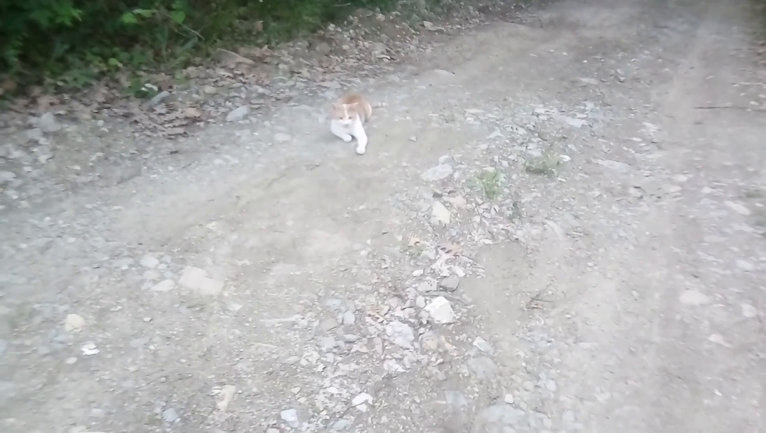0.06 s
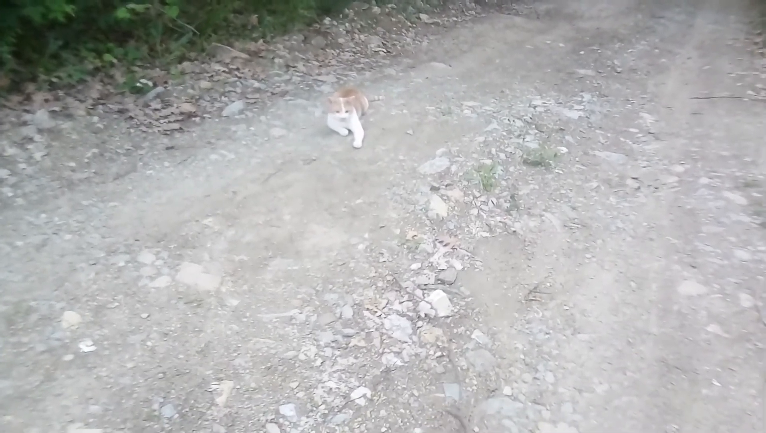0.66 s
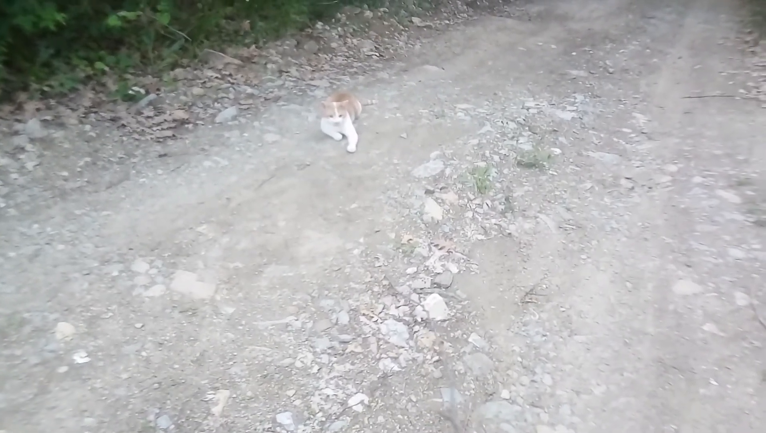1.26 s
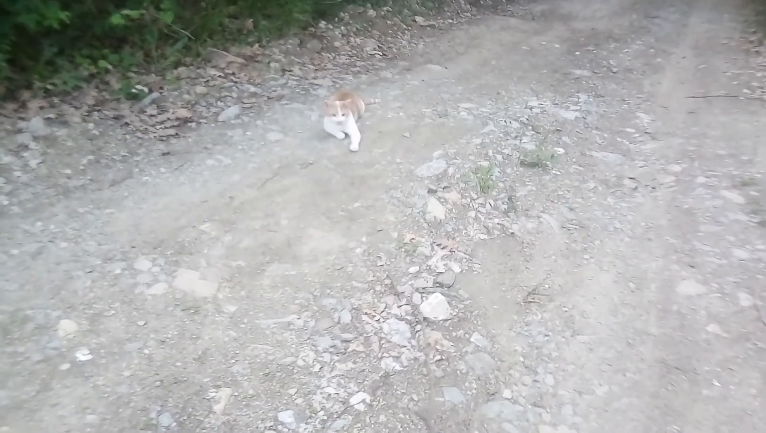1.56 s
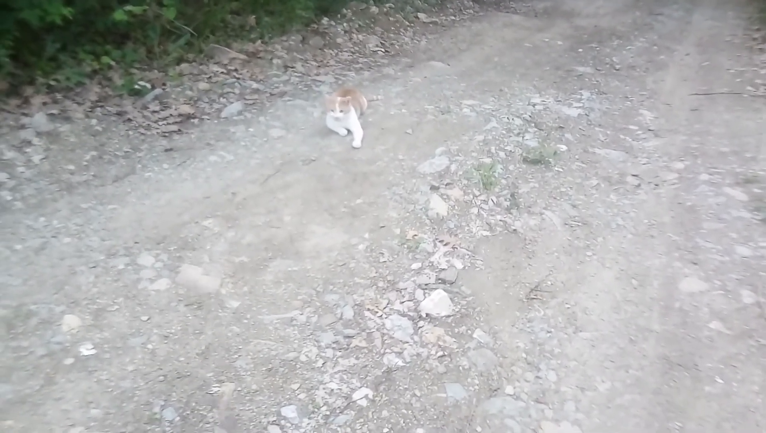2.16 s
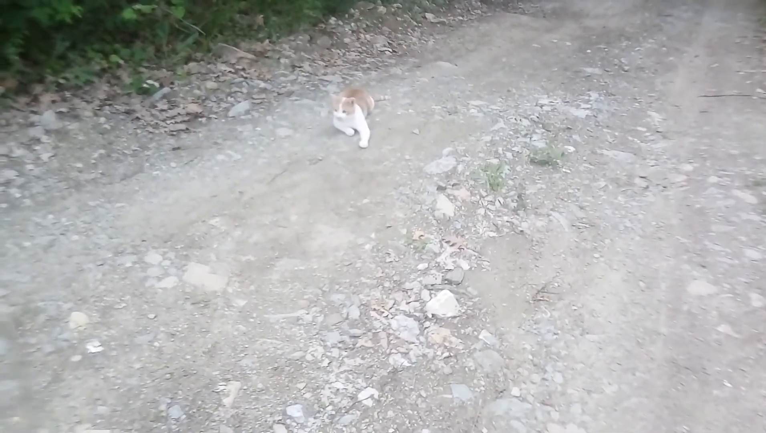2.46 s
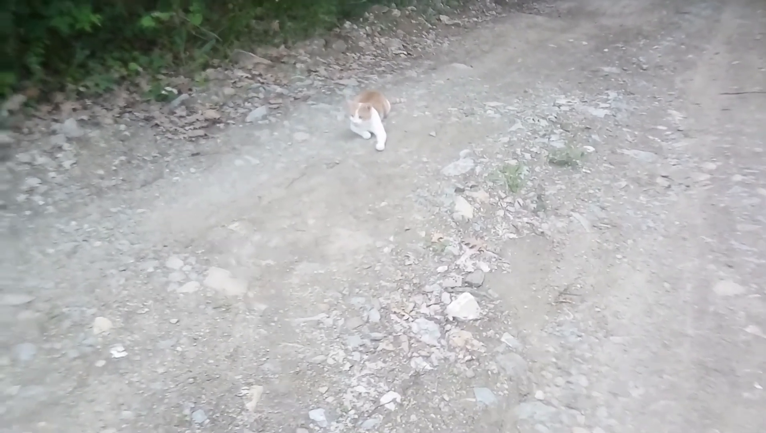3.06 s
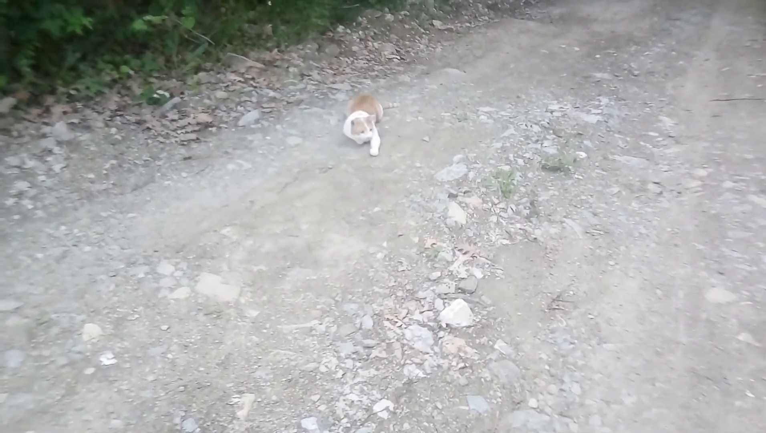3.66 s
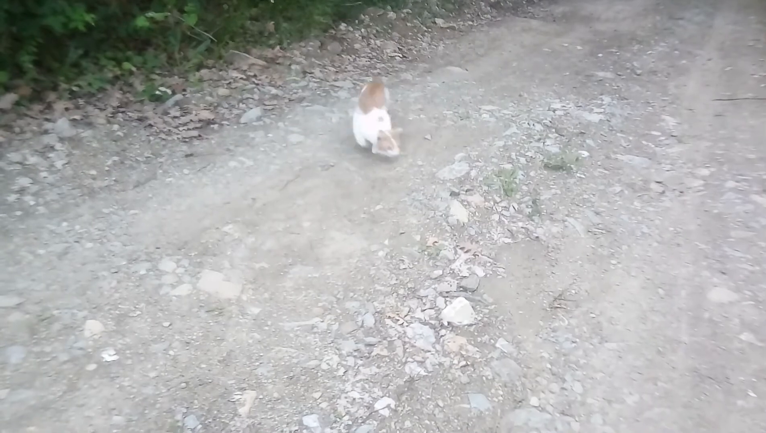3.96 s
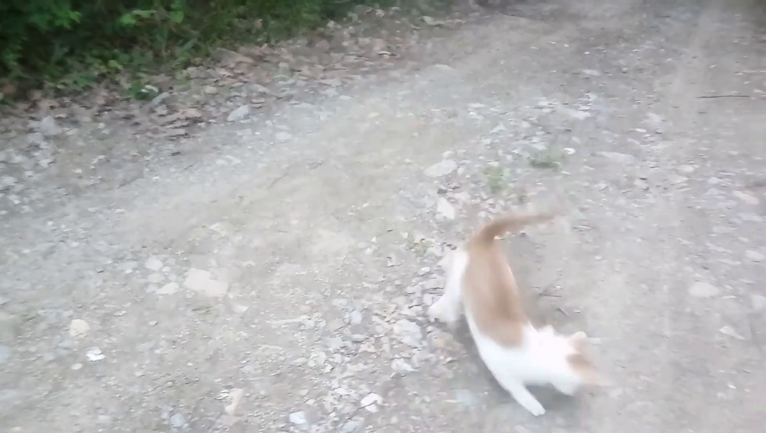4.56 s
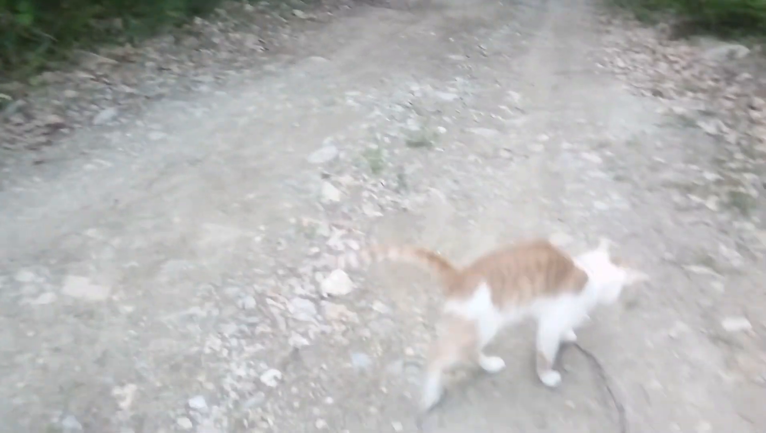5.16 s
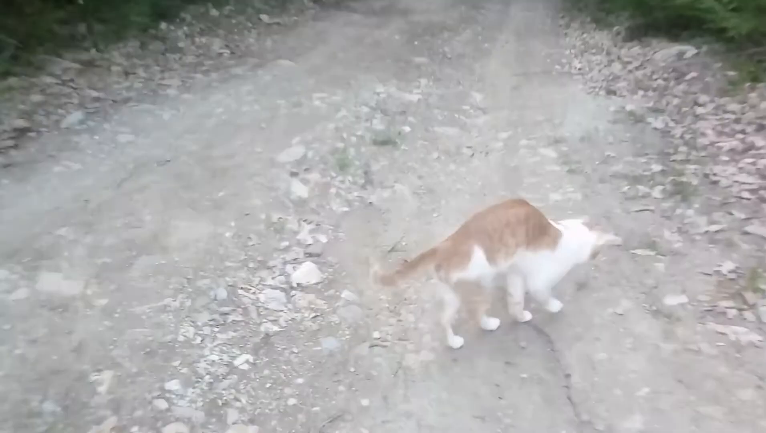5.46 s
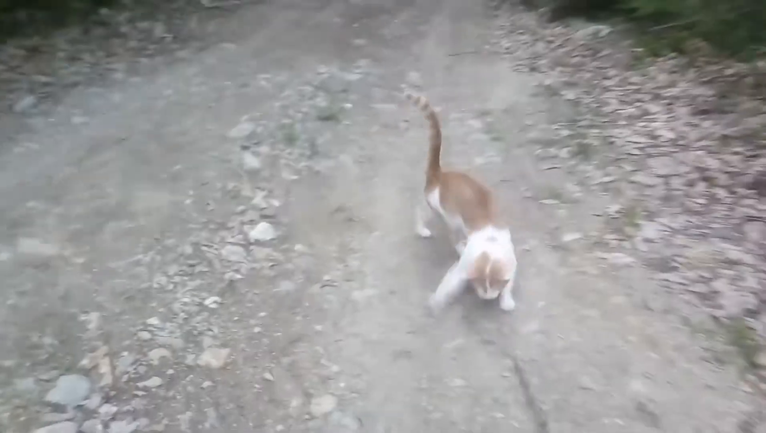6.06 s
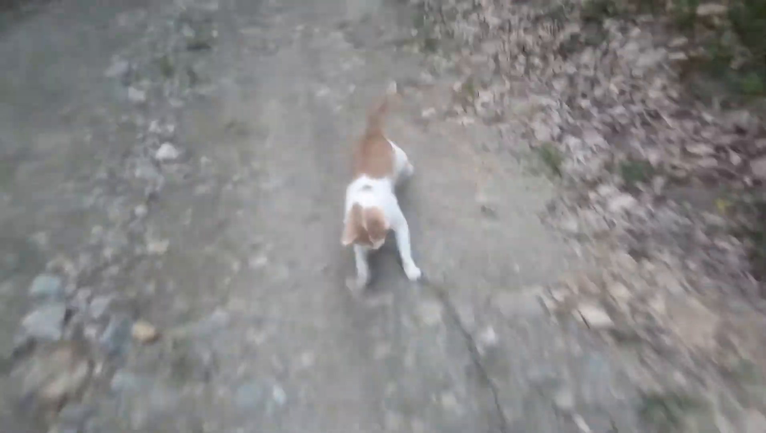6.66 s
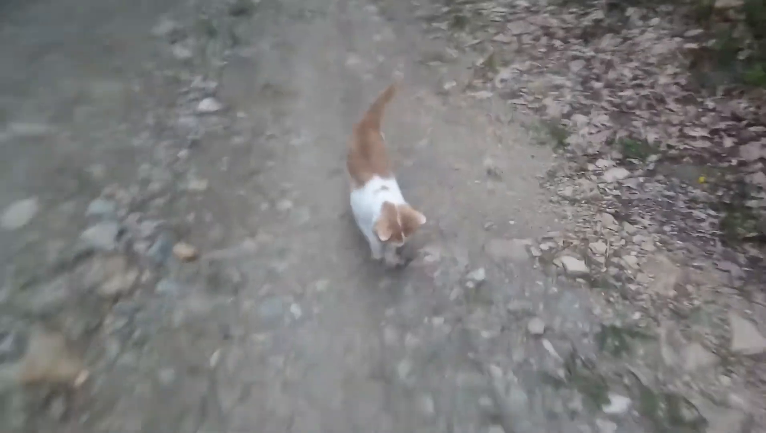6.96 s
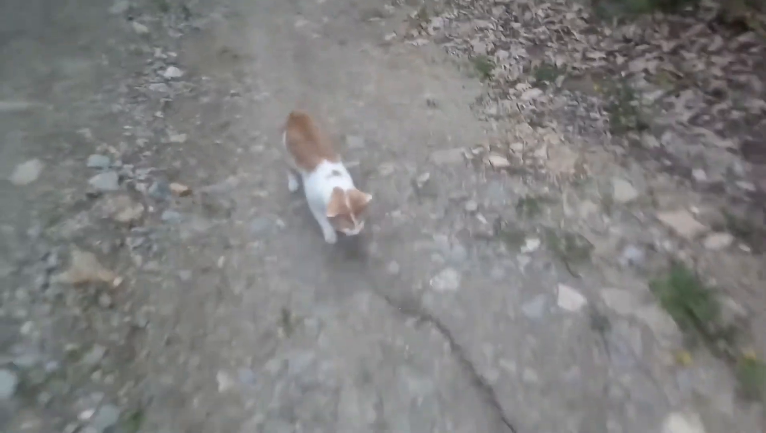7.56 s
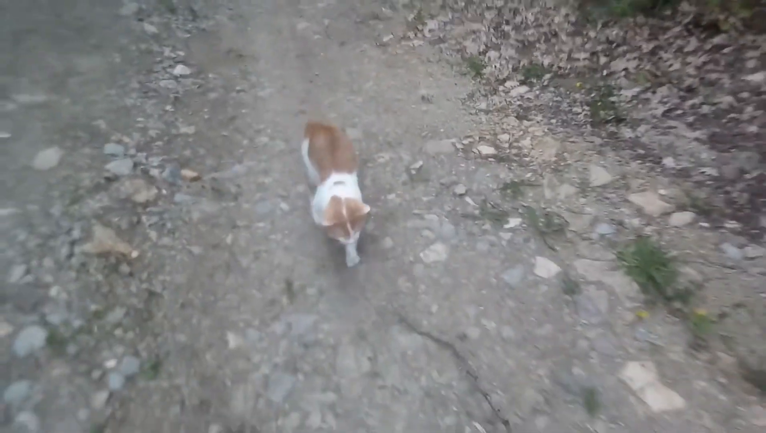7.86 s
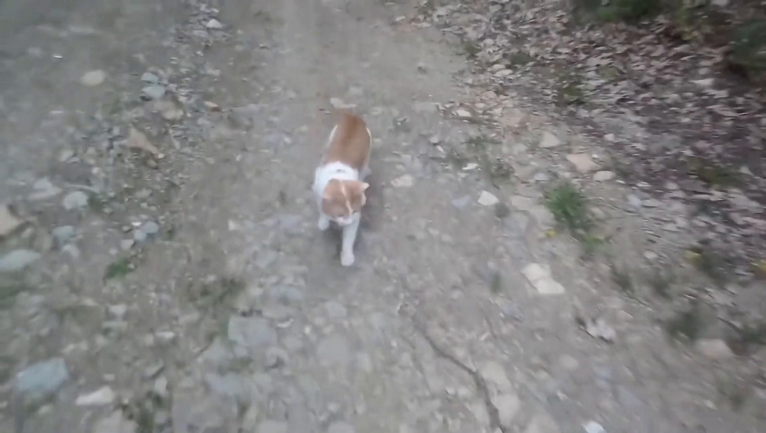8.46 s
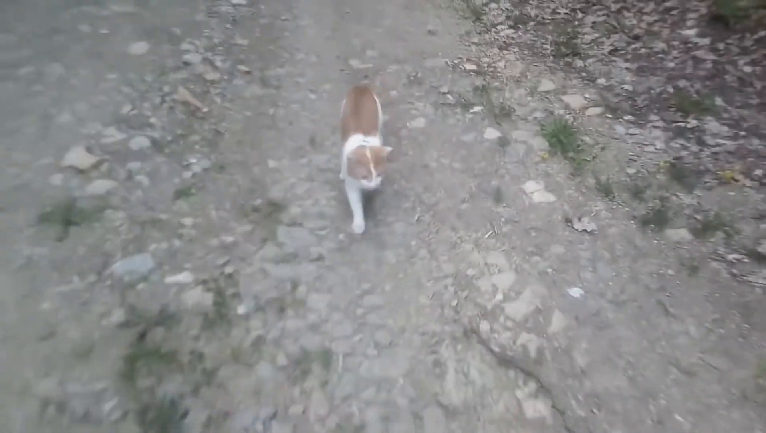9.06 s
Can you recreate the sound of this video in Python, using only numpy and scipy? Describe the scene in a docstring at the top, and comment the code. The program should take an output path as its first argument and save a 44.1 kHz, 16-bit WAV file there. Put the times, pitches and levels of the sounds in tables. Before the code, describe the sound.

Someone stands on a gravel road with faint handling clicks, then walks slowly, soles scraping, stones crunching and a twig trailing.

```python
"""Backwards along a gravel road

Small dry clicks come from the casing in the hand as someone stands on a quiet gravel road. They walk
slowly backwards, trailing a twig: soles scuff the dirt and stones crunch, close to the microphone and
mostly on its left. Behind lie a soft outdoor rumble, thin hiss and a few far bird notes."""
import sys
import numpy as np
from scipy import signal
from scipy.fft import rfft, irfft, next_fast_len
from scipy.io import wavfile

SR = 44100
rng = np.random.default_rng(int(sys.argv[2]) if len(sys.argv) > 2 else 0)


def generate_wav(signal):
    """Clip the signal to [-1, 1] and save it as 16-bit WAV at the path in sys.argv[1]."""
    frames = np.transpose(np.atleast_2d(signal))
    scaled = np.clip(frames, -1, 1) * 32767
    pcm = np.round(scaled).astype(np.int16)
    wavfile.write(sys.argv[1], SR, pcm)


N = 409688

# background rumble and hiss, with the recorder's own thin peak near 15 kHz: f/Hz, level per Hz/dB
BACKGROUND_LEFT = [(20, -103), (70, -93.5), (130, -89), (300, -95), (700, -100), (1500, -102.5),
                   (4000, -104), (6700, -105), (8000, -114), (13800, -115), (15300, -105)]
BACKGROUND_RIGHT = [(20, -104), (45, -82), (85, -76.5), (140, -77.5), (230, -84), (450, -90), (800, -96.5),
                    (1600, -103), (4000, -105), (6700, -106), (8000, -115), (13800, -116), (15300, -106)]
# strokes of a sole over the dirt: t/s, length/s, level/dB, brightness/dB
SOLE_STROKES = [(0.153, 0.048, -62, 6), (0.207, 0.084, -55.5, -5), (0.337, 0.08, -59.5, 4),
                (2.17, 0.16, -61.5, 0), (2.34, 0.095, -51, 3), (2.46, 0.22, -62.5, 1),
                (2.802, .13, -57, -2), (3.259, 0.048, -45.5, 1), (3.945, 0.21, -66.5, 2),
                (4.339, 0.093, -43.5, -0.5), (4.462, 0.053, -42, 1), (4.525, 0.15, -45.5, -5),
                (4.718, .1, -52, -2), (4.893, 0.13, -56, -1), (5.004, 0.1, -46, 0.5),
                (5.435, 0.052, -55, -7), (5.62, 0.16, -51.5, -7), (5.855, .15, -53.5, -3.5),
                (6.082, 0.21, -42.5, -7.5), (6.301, 0.16, -46, -3.5), (6.464, 0.1, -46.5, 2.5),
                (6.603, 0.067, -48, 1.5), (6.805, 0.12, -40.5, -3), (7.082, 0.12, -42.5, -0.5),
                (7.234, 0.1, -46, -2), (7.395, 0.15, -45, -18), (7.595, 0.088, -48, 5.5),
                (7.939, .1, -49, -1.5), (8.158, 0.098, -47, 3), (8.442, .07, -50.5, 3.5),
                (8.582, 0.18, -49, 2), (9.157, 0.11, -53, -2)]
# dry clicks close to the microphone: t/s, bite level over 10 ms/dB, brightness/dB, ring f/Hz
CLICKS = [(0.2331, -43, -18, 2100), (0.2615, -42, -22, 2100), (0.3546, -45.5, -25, 2940),
          (0.3884, -37.5, -6, 2320), (0.5637, -55, -1.5, 2270), (0.6617, -51, -1.5, 3200),
          (0.891, -52, -6, 3630), (1.2087, -37.5, -12.5, 2210), (1.2303, -50, -2, 4000),
          (1.2545, -40, -9, 2930), (1.545, -56, 0.5, 2220), (1.6442, -52.5, 3.5, 2880),
          (1.934, -37.5, -12, 3200), (1.9639, -35.5, -17, 3200), (2.005, -48, -2.5, 2950),
          (2.05, -35.5, -11, 2770), (2.1352, -46, -1, 5750), (2.1897, -46, -5, 2730),
          (2.2049, -39, -18, 2770), (2.215, -40, -1.5, 6100), (2.257, -34.5, -10, 2930),
          (2.2666, -39, -4, 2810), (2.2744, -38.5, -1, 4460), (2.2978, -42, -5, 2850),
          (2.3467, -42, 6.5, 6290), (2.3764, -41.5, 8, 4310), (2.384, -35, -6, 4420),
          (2.4326, -37.5, -13, 2800), (2.456, -38, -6, 4400), (2.5025, -47, -9, 3570),
          (2.53, -45, -8, 4050), (2.5857, -38.5, -6, 4200), (2.664, -50.5, -9, 4100),
          (2.8399, -47, -27, 2350), (2.8623, -40, -9, 4100), (2.8907, -46.5, -1, 5940),
          (2.9403, -37, -14, 3360), (3.007, -50, 5, 3700), (3.1376, -49.5, -2.5, 4060),
          (3.24, -43, -5, 4630), (3.254, -19, -11, 3580), (3.2738, -28, -8, 4600), (3.2965, -35, -13, 2100),
          (3.3666, -32.5, -8, 3170), (3.4678, -40.5, -6, 3650), (3.482, -43, -4, 3860),
          (3.9394, -47, -12, 2220), (4.0888, -45, -25, 2310), (4.108, -44, -7, 2880),
          (4.4071, -33, -5, 7140), (4.4156, -36, -21, 2690), (4.5755, -41, -15, 2500),
          (4.6714, -43, -24, 2400), (4.7098, -41, -29, 4040), (4.7965, -37, -12, 2520),
          (4.801, -26, -23, 2690), (4.859, -40, -12, 1230), (4.891, -36, -12, 2830),
          (4.9871, -44.5, -4, 6430)]
# far bird notes: t/s, length/s, first f/Hz, last f/Hz, level/dB
BIRD_NOTES = [(0.435, 0.21, 2940, 3010, -69), (0.793, 0.18, 3500, 3250, -73),
              (1.012, 0.14, 2680, 3020, -71)]
# weight settling on a foot: t/s, level/dB
FOOTFALLS = [(2.26, -70), (3.255, -58), (4.025, -58.5), (4.41, -52), (4.66, -54), (5.44, -51), (6.12, -46),
             (6.85, -65), (7.23, -70), (8.24, -53), (8.32, -53), (8.57, -48.5)]
# stones crunching underfoot: t/s, bite level over 10 ms/dB, brightness/dB, ring f/Hz, slip time/ms
CRUNCHES = [(5.047, -39, -3, 6130, 1.5), (5.8881, -34.5, -14, 2620, 7.7), (6.0784, -43, 3, 2690, 0.89),
            (6.1246, -33, -15, 3200, 5), (6.2419, -29.5, -11.5, 4080, 2), (6.5258, -28.5, -10, 2640, 9.6),
            (6.5441, -28.5, -9, 3300, 4.9), (6.8371, -33.5, -2, 3770, 0.8), (6.8775, -34, -22, 3350, 1.1),
            (6.9139, -41, -18, 3320, 0.45), (6.9302, -35.5, -21, 4300, 5.6),
            (6.9636, -44.5, -14, 1750, 8.5), (7.0328, -40, -4, 5230, 0.38), (7.0473, -44, 5, 6300, 1.1),
            (7.0849, -38.5, 4, 5650, 2.1), (7.1039, -35.5, -16, 3750, 4), (7.1774, -31, 1.5, 4150, 1.2),
            (7.1945, -31.5, -10, 4170, 3.6), (7.4189, -36.5, -28, 3340, .25), (8.11, -44, -4, 1600, 0.39),
            (8.2406, -36.5, 3, 1560, 3.7), (8.2485, -39.5, 4, 1610, 1), (8.449, -44, 5, 3930, 2.5),
            (8.6371, -46.5, 12, 6220, 2.4), (8.8481, -47, 11, 6700, 1.3), (9.2159, -42, -3.5, 3000, 2.7)]
# the twig trailing over the ground: t/s, level/dB
TWIG_DRAG = [(5.4, -78), (5.6, -59), (6.05, -68), (6.4, -69), (6.8, -52), (7.05, -62), (7.3, -47),
             (7.84, -53.5), (7.9, -56.5), (8.3, -51), (8.92, -51.5), (9.02, -61.5)]
# contact colours, each with the recorder's own thin peak near 15 kHz: f/Hz, relative level/dB
RUSTLE_COLOUR = [(100, 3.5), (450, 3.5), (800, -0.5), (1500, 1.5), (2600, 11.5), (3600, 4), (5200, -7),
                 (6500, -5), (8500, -11.5), (13500, -16.5), (15200, -13)]
CLICK_COLOUR = [(100, -12.5), (400, -2), (800, -0.5), (1500, -7), (2200, 0), (3300, -1), (5400, -5.5),
                (6600, -3), (8500, -11.5), (11000, -17), (13800, -26), (15200, -12)]
WALKING_COLOUR = [(30, 2), (80, -1), (250, 1.5), (700, 4), (1400, -10), (2800, 6), (4200, 1), (5200, -5),
                  (6900, 1.5), (8200, -0.5), (10000, 1), (12000, -4.5), (13900, -2), (15200, 5.5)]
# fixed resonances heard while standing and while walking: f/Hz, width/Hz, boost/dB
STANDING_PEAKS = [(686, 160, 4.5), (924, 32, 8), (1186, 80, 7), (2100, 30, 7.5), (2300, 55, 6.5),
                  (2690, 340, 6.5), (2930, 80, 6), (3470, 300, 7.5), (4130, 180, 6), (4570, 140, 3.5),
                  (4900, 130, -1), (6290, 520, 4.5)]
WALKING_PEAKS = [(1173, 310, 11.2), (1600, 97, 7.6), (2030, 85, 5.6), (3190, 210, 2), (4120, 150, 6.3),
                 (6130, 1200, 12)]
# the three bands of a contact (body, bite, brightness): low f/Hz, high f/Hz
BAND_EDGES = [(25, 1700), (1700, 5000), (5000, 16000)]
# each band on the microphone's right, against its left: level/dB
RIGHT_DB = [-18.5, -9, -3.5]
# left-right likeness of each band, 0 to 1
ALIKE = [.35, .76, .5]

WALK_START_S = 5.3
USUAL_DB, USUAL_HZ = -40, 3000  # a middling contact
STROKE_ATTACK_S, STROKE_RELEASE_S = 0.015, 0.018
SCUFF_BODY_DB, SCUFF_BODY_FALL = -9.5, 0.37  # body at the usual level, dB lost per dB above it
TWIG_BRIGHT_DB, BIRD_FLUTTER_DB = 2, 4
THUD_S, THUD_BAND_HZ, THUD_RIGHT_DB = 0.015, (65, 320), -3
RIGHT_LAG_S, LAG_SWAY_S = .00006, .00007


def from_db(db):
    return 10 ** (np.asarray(db) / 20)


def unit_energy(x):
    return x / np.sqrt(np.sum(x ** 2) + 1e-20)


def drift(per_s):
    """A smooth random wander with a spread near 1."""
    knots = rng.standard_normal(N // 20)
    return 1.2 * np.interp(np.arange(N) / SR * per_s, np.arange(len(knots)), knots)


def gain_at(points, size):
    """A spectrum of (f/Hz, level/dB) points as gains on an FFT grid."""
    hz, db = np.transpose(points)
    grid_hz = np.arange(size // 2 + 1) * SR / size
    return from_db(np.interp(np.log(grid_hz + 1), np.log(hz), db))


def background():
    """Steady outdoor rumble and hiss, topped by the recorder's thin peak; unrelated on the two sides."""
    size = 2 * next_fast_len(N // 2 + 1, True)
    sides = (BACKGROUND_LEFT, BACKGROUND_RIGHT)
    spectra = [rfft(rng.standard_normal(size)) * gain_at(side, size) for side in sides]
    return irfft(spectra)[:, :N] * np.sqrt(SR / 2)


def contact_bands(colour, peaks, size=1280):
    """One slip as the microphone hears it ring, in each of the three bands, with unit energy."""
    cepstrum = irfft(np.log(gain_at(colour, size)))
    cepstrum[1:size // 2] *= 2  # minimum phase: nothing sounds before the slip
    cepstrum[size // 2 + 1:] = 0
    ring = irfft(np.exp(rfft(cepstrum)))
    for hz, width_hz, boost_db in peaks:
        resonance = signal.lfilter(*signal.iirpeak(hz, hz / width_hz, SR), ring)
        ring = ring + (from_db(boost_db) - 1) * resonance
    filters = [signal.butter(4, edges, "band", fs=SR, output="sos") for edges in BAND_EDGES]
    return [unit_energy(signal.sosfilt(band, ring)) for band in filters]


def grains(size, per_s, spread_db):
    """Tiny random slips of uneven strength; the two rows share times but not signs; rms 1."""
    slipping = rng.random(size) < per_s / SR
    strength = from_db(spread_db * np.minimum(rng.exponential(1, size), 4))
    train = slipping * strength * rng.standard_normal((2, size))
    return unit_energy(train) * np.sqrt(2 * size)


def at_microphone(pair, alike):
    """The right side hears partly the same slips as the left, partly scattered ones."""
    return np.array([pair[0], np.sqrt(alike) * pair[0] + np.sqrt(1 - alike) * pair[1]])


def pebbles(per_s, spread_db, width_hz, count=16):
    """Loose stones knock together, each ringing for a few ms at its own pitch; rms 1."""
    knocks, out = grains(N, per_s, spread_db), 0
    struck = rng.integers(0, count, N)
    pitches_hz = np.linspace(1400, 8000, count) + rng.uniform(-150, 123, count)
    for stone, hz in enumerate(pitches_hz):
        own_knocks = knocks * (struck == stone) + 1e-18
        out = out + signal.lfilter(*signal.iirpeak(hz, hz / width_hz, SR), own_knocks)
    return unit_energy(out) * np.sqrt(2 * N)


def sliding_levels(t):
    """Level, body and brightness in dB: sole strokes rise, hold and die away over the twig's drag."""
    bite_power = from_db(np.interp(t, *np.transpose(TWIG_DRAG))) ** 2
    bright_power = bite_power * from_db(TWIG_BRIGHT_DB) ** 2
    for start, length, db, bright_db in SOLE_STROKES:
        attack = np.clip((t - start) / STROKE_ATTACK_S, 0, 1)
        release = np.exp(-np.clip((t - start - length) / STROKE_RELEASE_S, 0, 20))
        stroke = from_db(db) * attack * release
        bite_power += stroke ** 2
        bright_power += (stroke * from_db(bright_db)) ** 2
    db = 10 * np.log10(bite_power)
    # a light scuff is full of body; pressing harder adds mostly bite
    body_db = np.minimum(SCUFF_BODY_DB - SCUFF_BODY_FALL * (db - USUAL_DB), 0)
    return db, body_db, 10 * np.log10(bright_power / bite_power)


def scuffs(bands, part, stones, gain_db, stones_db, per_s, spread_db, catch_db, grit_db):
    """Sliding soles and twig set off grit and loose stones, catching and freeing many times a second."""
    t, out = np.arange(N)[part] / SR, np.zeros((2, N))
    db, body_db, bright_db = sliding_levels(t)
    slips = grains(len(t), per_s, spread_db) + from_db(stones_db) * stones[:, part]
    catching_db = catch_db * (0.54 * drift(70) + .5 * drift(260))
    band_db, flutter_db = (body_db, 0, bright_db), (1.5, 1.8, grit_db)
    for band, response in enumerate(bands):
        flutter = from_db((catching_db + flutter_db[band] * drift(150))[part])
        friction = at_microphone(slips, ALIKE[band]) * flutter
        crackle = signal.oaconvolve(friction, response[None], axes=1)[:, :len(t)]
        gain = from_db(gain_db + db + band_db[band]) * from_db([[0], [RIGHT_DB[band]]])
        out[:, part] += unit_energy(crackle) * np.sqrt(2 * len(t)) * gain
    return out


def with_body(events, usual_body_db, fall_per_db, db_per_octave):
    """Adds a body column in dB: harder snaps keep less body; lower-pitched ones have more of it."""
    start, db, bright_db, hz, slip_ms = np.transpose(events)
    body_db = usual_body_db - fall_per_db * (db - USUAL_DB) - db_per_octave * np.log2(hz / USUAL_HZ)
    return np.transpose([start, db, body_db, bright_db, slip_ms, hz])


def snaps(events, bands, creep_db, tail_db, tail_s, band_stretch, ring_db, ring_q, size=3000):
    """A contact creeps, gives way in a ringing burst of slips a few ms long, then scatters faintly."""
    lead_s, out = .008, np.zeros((2, N + 2 * size))
    t = np.arange(size) / SR - lead_s
    creep = from_db(creep_db) * np.exp(-np.abs(t) / 0.0018)
    scatter = from_db(tail_db) * np.exp(-t / tail_s)
    for start, db, body_db, bright_db, slip_ms, hz in events:
        slips = grains(size, per_s=9000, spread_db=3.5)
        at = int((start - lead_s) * SR)
        resonator = signal.iirpeak(hz, ring_q, SR)
        for band, band_db in enumerate((body_db, 0, bright_db)):
            age = np.maximum(t, 0) / (slip_ms * band_stretch[band] / 1000)
            force = creep + age * np.exp(1 - age) + scatter * np.tanh(age)
            burst = at_microphone(slips, ALIKE[band]) * force
            burst = burst + from_db(ring_db) * signal.lfilter(*resonator, burst)
            snap = signal.fftconvolve(burst, bands[band][None], axes=1)
            for side, side_db in enumerate((0, RIGHT_DB[band])):
                gain = from_db(db + band_db + side_db) * np.sqrt(SR / 100)  # level over 10 ms
                out[side, at:at + snap.shape[1]] += gain * unit_energy(snap[side])
    return out[:, :N]


def clicks(slip_ms):
    """Dry clicks and creaks by the microphone, from the casing in the hand and perhaps grit underfoot."""
    events = [(*row, slip_ms) for row in CLICKS]
    events = with_body(events, usual_body_db=-11.5, fall_per_db=0.44, db_per_octave=3.0)
    return snaps(events, contact_bands(CLICK_COLOUR, STANDING_PEAKS), creep_db=-12, tail_db=-13,
                 tail_s=0.011, band_stretch=(2.2, 1, 1), ring_db=4, ring_q=9)


def bird():
    """Soft gliding whistles from the trees, far off."""
    t, out = np.arange(N) / SR, np.zeros(N)
    waver = 1 + 0.0084 * drift(91.5)
    for start, length, first_hz, last_hz, db in BIRD_NOTES:
        along = np.clip((t - start) / length, 0, 1)
        hz = (first_hz + (last_hz - first_hz) * along) * waver
        swell = from_db(db + BIRD_FLUTTER_DB * drift(60)) * np.sin(np.pi * along)
        out += swell * np.sin(2 * np.pi * np.cumsum(hz) / SR)
    return out


def footfalls():
    """Soft low thuds of weight on packed earth."""
    t, force = np.arange(N) / SR, 0
    for start, db in FOOTFALLS:
        age = np.clip((t - start) / THUD_S, 0, 20)
        force = force + from_db(db) * age * np.exp(1 - age)
    low_band = signal.butter(2, THUD_BAND_HZ, "band", fs=SR, output="sos")
    earth = signal.sosfilt(low_band, rng.standard_normal((2, N)))
    return unit_energy(earth) * np.sqrt(2 * N) * force * from_db([[0], [THUD_RIGHT_DB]])


def crunches(bands, top_hz):
    """Whole stones give way underfoot; their contacts last longer than grit's, so their top is duller."""
    dulled = signal.sosfilt(signal.butter(2, top_hz, fs=SR, output="sos"), bands)
    events = with_body(CRUNCHES, usual_body_db=-7.5, fall_per_db=0.73, db_per_octave=12.5)
    return snaps(events, dulled, creep_db=-10, tail_db=-19, tail_s=0.016,
                 band_stretch=(1, 1, 0.91), ring_db=6, ring_q=8)


def scene():
    """Close contacts reach the microphone's right a little later, by a lag that sways with the hand."""
    t, first_step = np.arange(N) / SR, int(WALK_START_S * SR)
    rustle = contact_bands(RUSTLE_COLOUR, STANDING_PEAKS)
    walking = contact_bands(WALKING_COLOUR, WALKING_PEAKS)
    stones = pebbles(per_s=1200, spread_db=3.5, width_hz=63)
    near = clicks(slip_ms=1.81) + crunches(walking, top_hz=10300)
    near += scuffs(rustle, slice(0, first_step), stones, gain_db=0, stones_db=-12,
                   per_s=7000, spread_db=0, catch_db=4, grit_db=-3)
    near += scuffs(walking, slice(first_step, N), stones, gain_db=0.65, stones_db=-5.5,
                   per_s=4000, spread_db=-0.5, catch_db=2, grit_db=1.5)
    lag_s = RIGHT_LAG_S + LAG_SWAY_S * drift(3)
    near[1] = np.interp(t - lag_s, t, near[1])
    return near + footfalls() + background() + bird()


def record(dry):
    """The recorder cuts the top steeply above 15.9 kHz."""
    return signal.sosfilt(signal.ellip(10, .2, 80, 15900, fs=SR, output="sos"), dry)


dry = scene()
out = record(dry)
generate_wav(out)
```